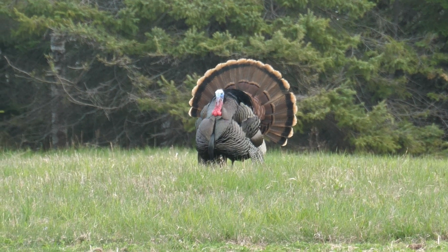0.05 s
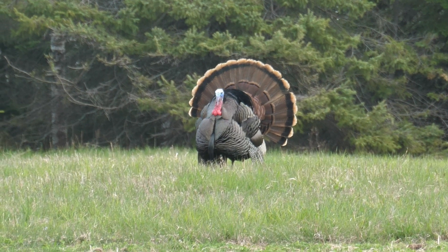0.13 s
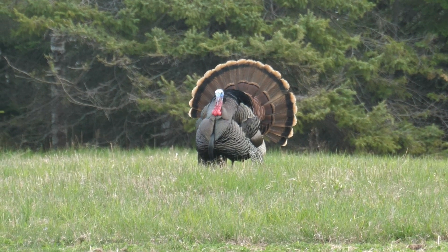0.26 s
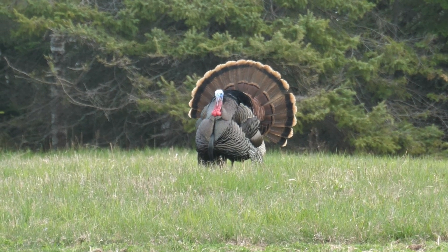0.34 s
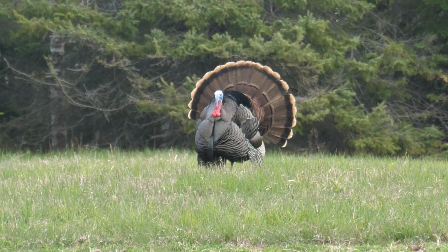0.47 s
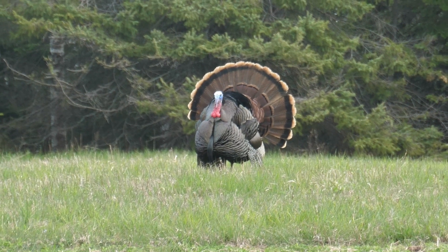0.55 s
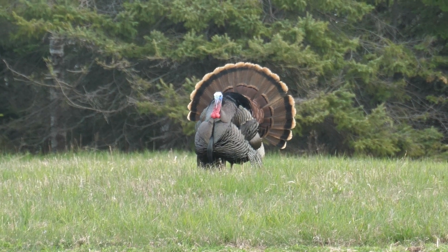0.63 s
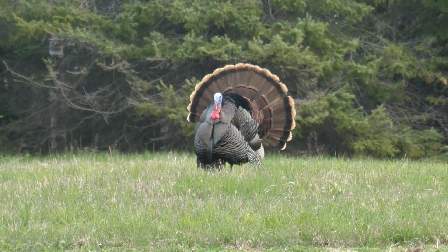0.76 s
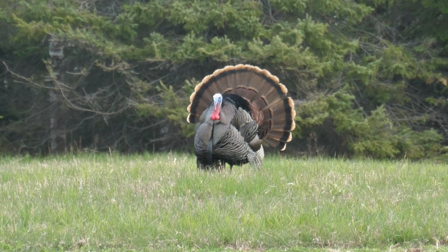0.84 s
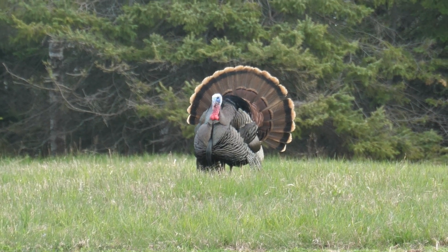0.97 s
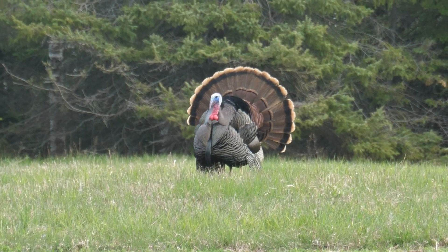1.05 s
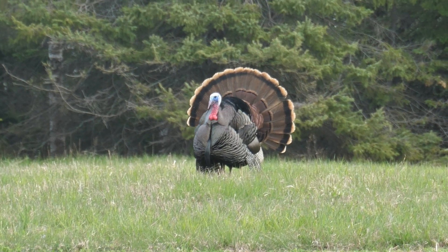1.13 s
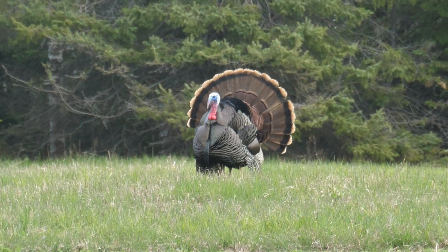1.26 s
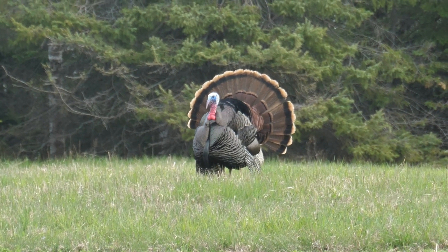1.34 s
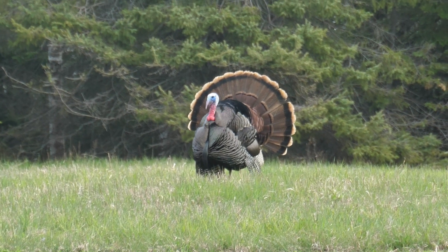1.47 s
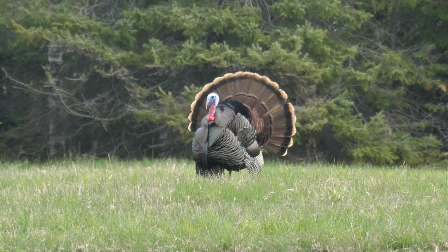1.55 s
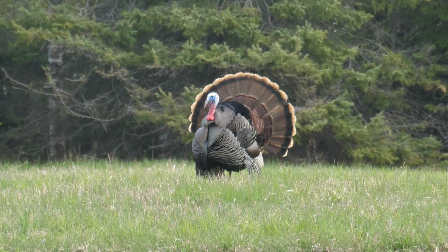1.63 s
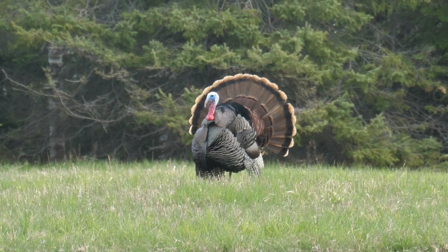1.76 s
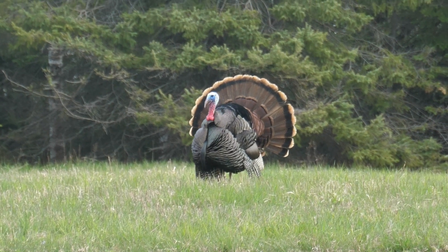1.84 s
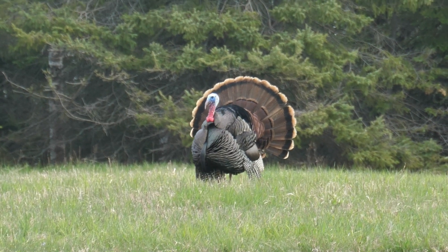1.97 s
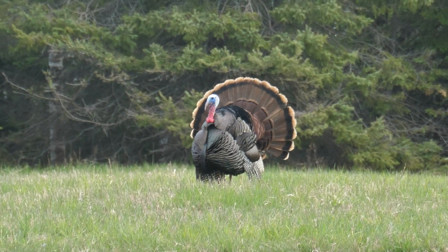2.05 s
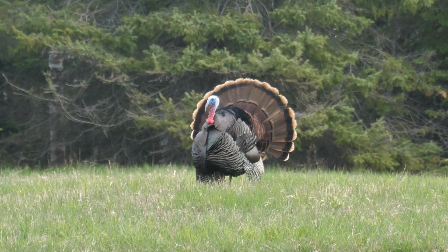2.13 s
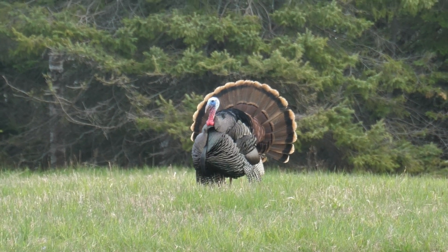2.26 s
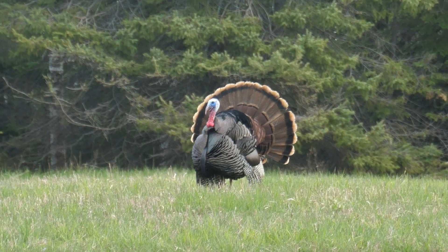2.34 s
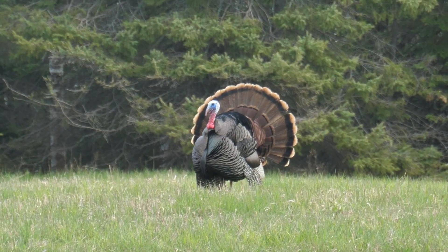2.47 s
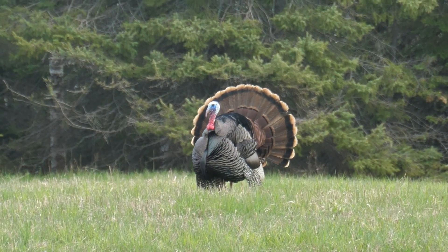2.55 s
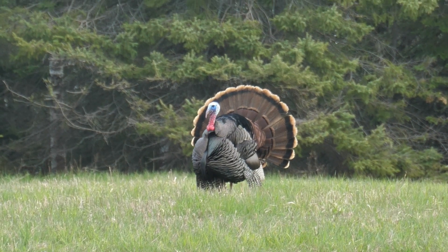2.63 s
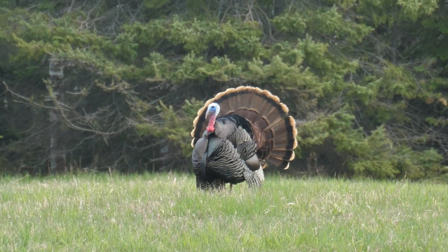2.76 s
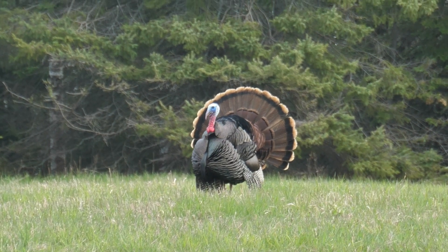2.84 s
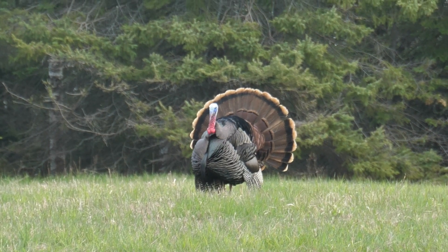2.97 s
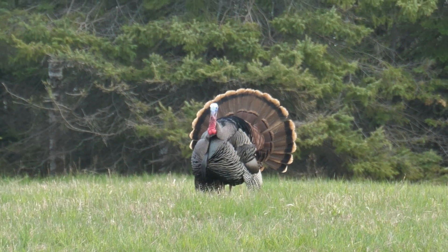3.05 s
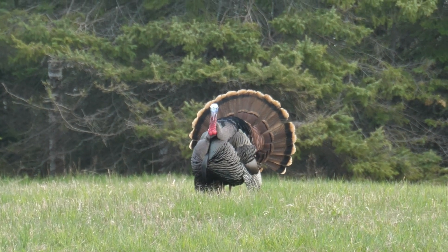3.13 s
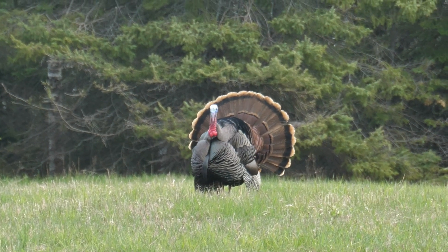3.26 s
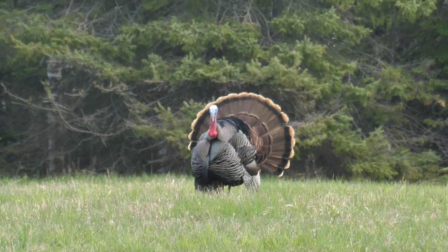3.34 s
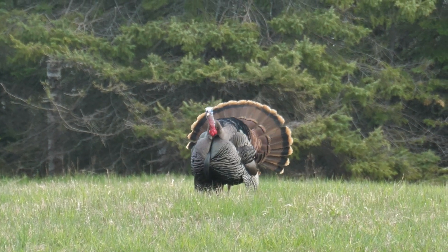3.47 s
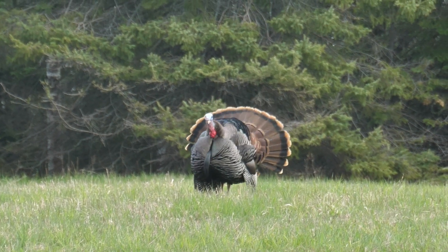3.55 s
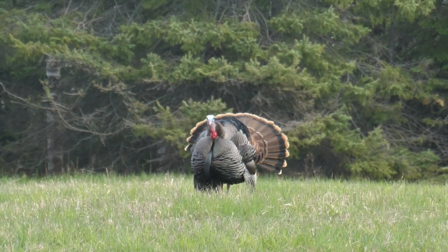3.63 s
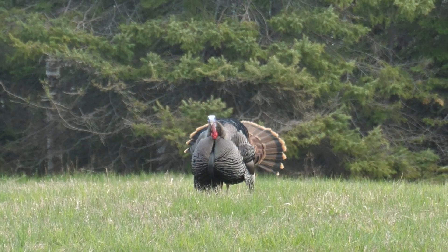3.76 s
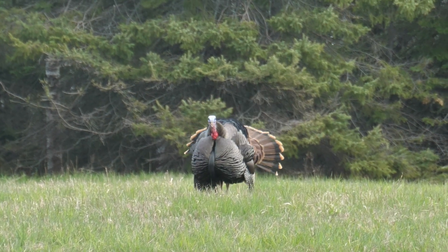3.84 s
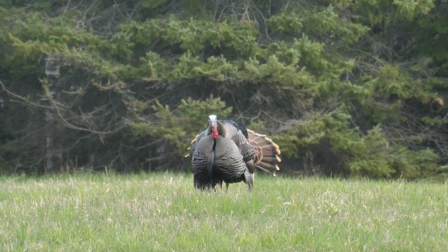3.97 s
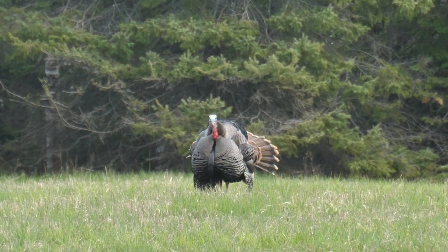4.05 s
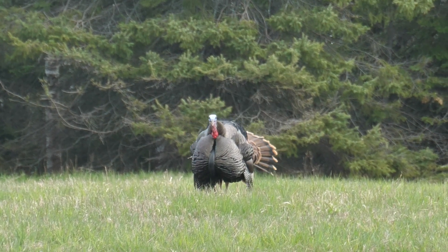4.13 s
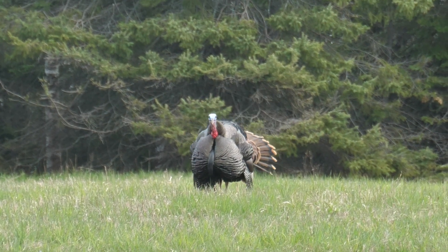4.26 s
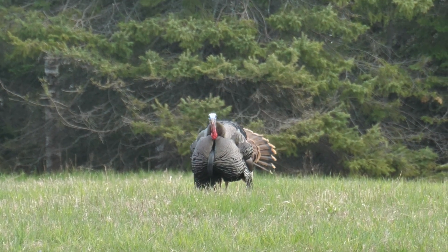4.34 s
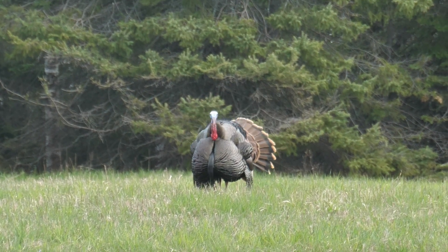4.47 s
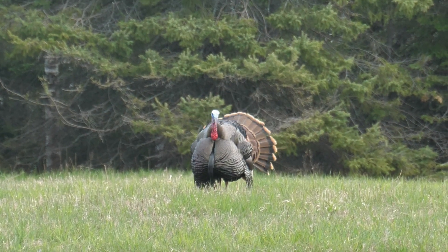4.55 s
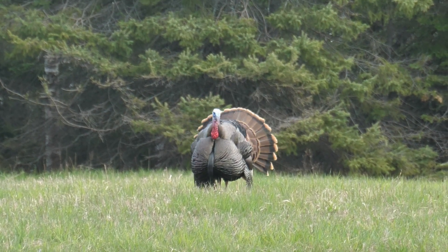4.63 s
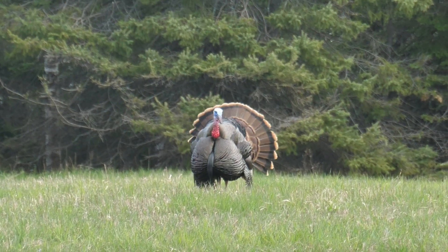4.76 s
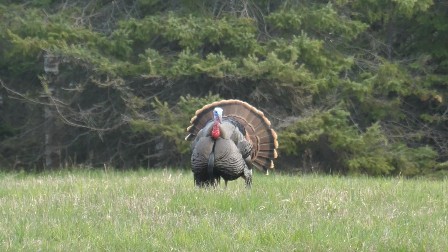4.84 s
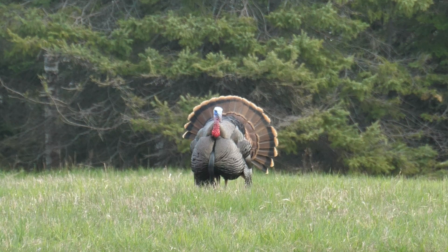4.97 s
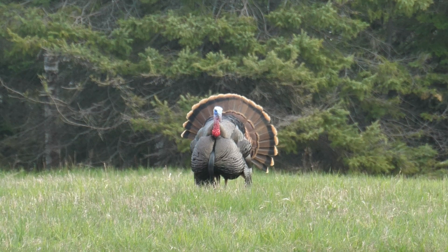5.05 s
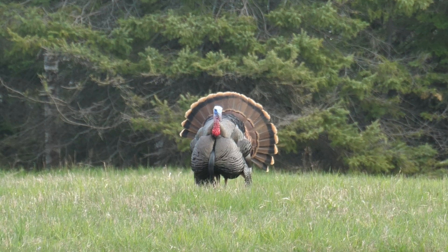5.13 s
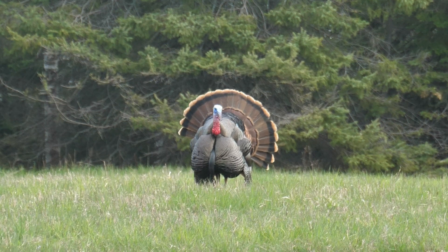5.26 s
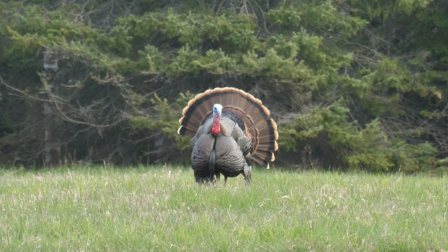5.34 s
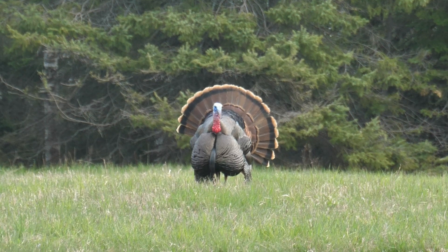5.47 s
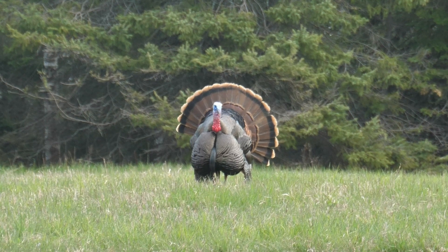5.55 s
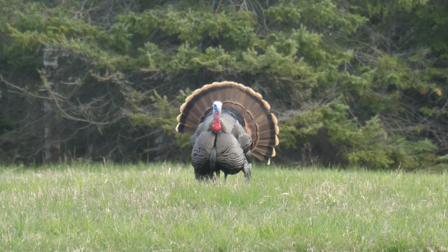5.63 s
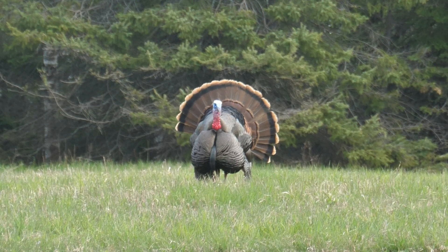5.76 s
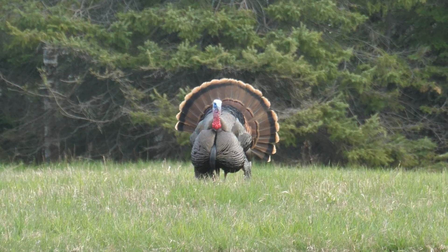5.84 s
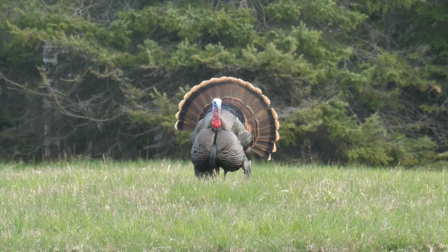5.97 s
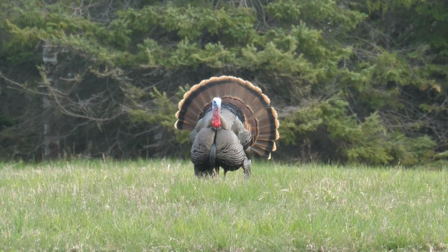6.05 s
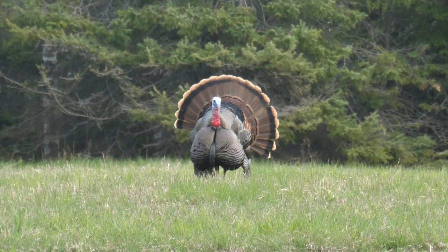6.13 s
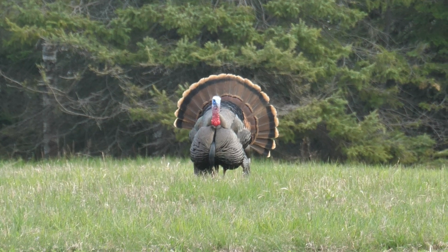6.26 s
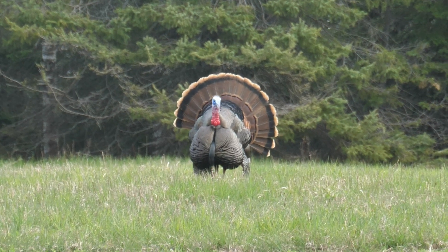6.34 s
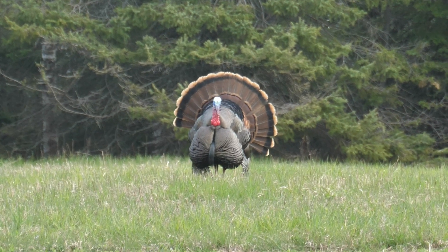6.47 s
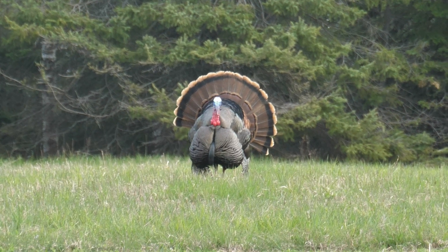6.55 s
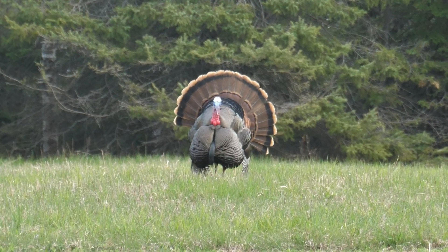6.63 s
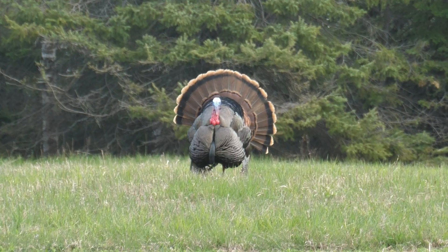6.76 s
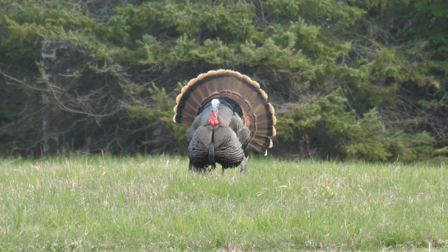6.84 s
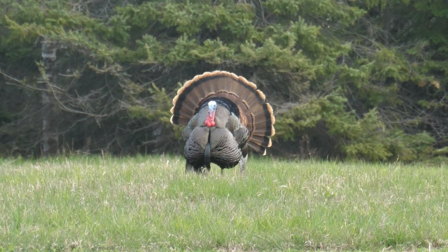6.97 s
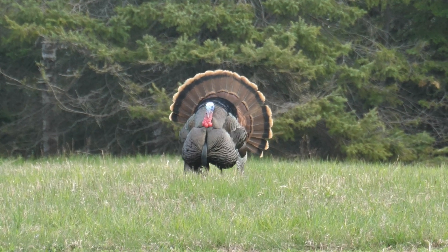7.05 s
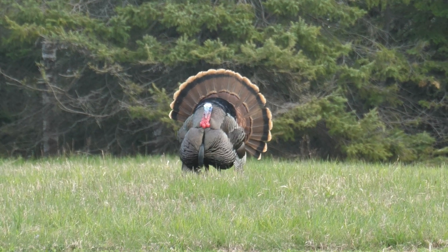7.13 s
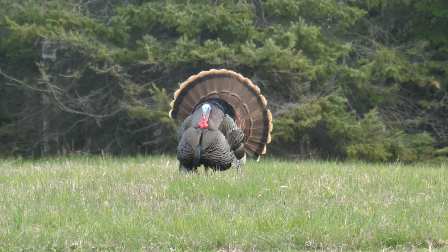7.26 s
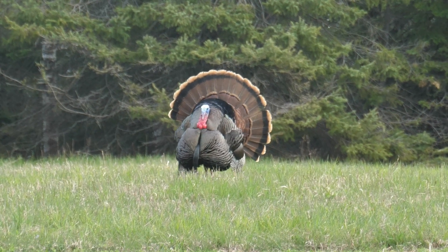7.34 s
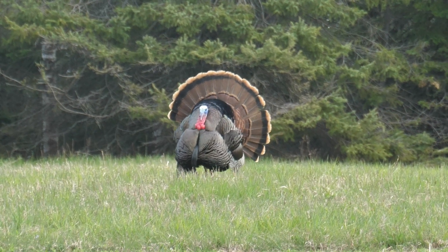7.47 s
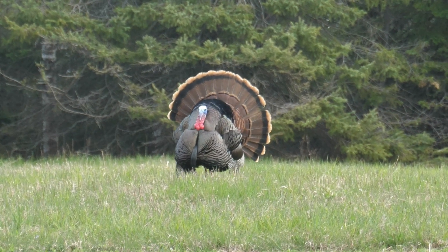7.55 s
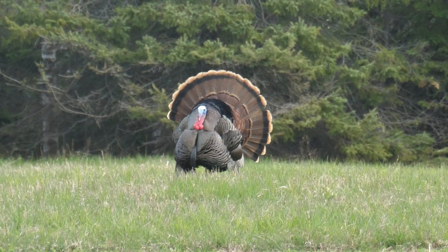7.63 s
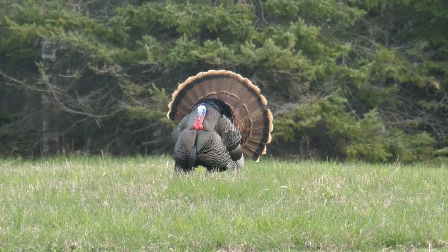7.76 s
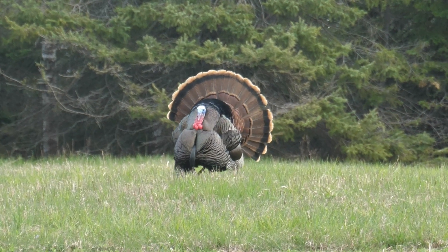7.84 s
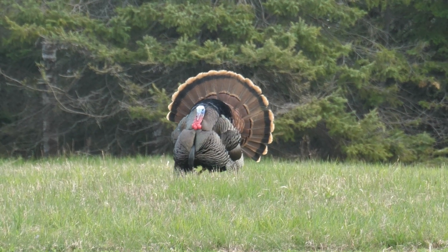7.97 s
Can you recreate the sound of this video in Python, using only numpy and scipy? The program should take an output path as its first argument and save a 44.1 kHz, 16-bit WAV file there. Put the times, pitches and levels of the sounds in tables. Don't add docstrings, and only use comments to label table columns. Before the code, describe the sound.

In a quiet meadow by pines, a wild turkey gives one loud rattling gobble amid thin birdsong, then later a tiny dry spit.

```python
import sys
import numpy as np
from scipy import signal
from scipy.io import wavfile
from scipy.ndimage import uniform_filter1d

SR = 44100
rng = np.random.default_rng(int(sys.argv[2]) if len(sys.argv) > 2 else 0)


def volts(x):
    e = np.asarray(x, float) / 20
    return 10 ** e


def generate_wav(signal):
    frames = np.transpose(np.atleast_2d(signal))
    scaled = np.clip(frames, -1, 1) * 32767
    pcm = np.round(scaled).astype(np.int16)
    wavfile.write(sys.argv[1], SR, pcm)


N = 352800


def evened(x):
    return x / np.sqrt(np.mean(x ** 2) + 1e-20)


def read(points, hz):
    f, value = np.transpose(points)
    return np.interp(np.log(hz + 1), np.log(f + 1), value)


def curve(points, s):
    return np.interp(s, *np.transpose(points))


def add(mix, s, sound):
    part = mix[max(round(s * SR), 0):][:len(sound)]
    part += sound[:len(part)]


def resonate(x, hz, width):
    turn = np.exp(2j * np.pi * np.cumsum(hz * np.ones(len(x))) / SR)
    r = np.exp(-np.pi * width / SR)
    smooth = signal.lfilter([(1 - r) ** 2], [1, -2 * r, r * r], x / turn)
    return 2 * (turn * smooth).real


def wander(count, hz):
    noise = rng.standard_normal(N // 32)
    return evened(signal.lfilter([1], [1, -np.exp(-2 * np.pi * hz / SR)], noise)[500:500 + count])


def cluck(db, hz, rough, chest_db, throat, jitter):
    count = len(hz)
    turns = np.cumsum(hz * (1 + jitter * rough * wander(count, 344))) / SR
    pulses = sum(np.sin(2 * np.pi * k * turns) * (k * hz < 9000) for k in range(1, 24))
    pulses = pulses * np.exp(1.2 * rough * wander(count, 310))
    puff = 0.28 + np.exp(-(turns % 1) / 0.18)
    breath = puff * rng.standard_normal(count)
    drive = (1 - rough) * evened(pulses) + rough * evened(breath)
    beak = (hz / hz.mean()) ** 0.82
    voiced = 0
    for f, width, gain_db in throat:
        in_chest = 800 < f < 1450
        voiced = voiced + volts(gain_db + chest_db * in_chest) * resonate(drive, f * beak, width)
    return volts(db) * evened(voiced) * np.hanning(count)


# centre in seconds, length in seconds, level in dB,
# starting pitch in Hz, final pitch in Hz.
CLUCKS = [(3.686, 0.021, -20.5, 1088, 1027), (3.721, .018, -38, 1290, 1380),
          (3.733, 0.02, -21.5, 1120, 1042), (3.763, 0.022, -29, 1200, 1150),
          (3.774, 0.028, -19.5, 1150, 1044), (3.882, .02, -21.5, 1071, 1020),
          (3.895, .012, -29, 1100, 1020), (3.922, 0.02, -18.5, 1101, 1041), (3.935, .014, -25, 1050, 1043),
          (4.037, 0.018, -22.5, 1040, 1020), (4.077, 0.02, -22, 1124, 976), (4.201, 0.02, -22, 1050, 1020),
          (4.209, .022, -25.5, 1050, 1050), (4.237, .032, -25.5, 1150, 1114),
          (4.245, 0.014, -20.5, 1020, 1020), (4.362, 0.021, -24.5, 1090, 965),
          (4.395, 0.035, -26, 1126, 1113), (4.404, .022, -23, 1106, 1076),
          (4.524, 0.035, -24.5, 1138, 1069), (3.674, .014, -38, 1116, 1100), (4.542, .035, -38, 1020, 1065)]
# time in seconds, roughness from 0 to 1.
STRAIN = [(3.69, .14), (3.73, .36), (3.78, .32), (3.9, .28), (4.04, .26), (4.25, .16), (4.36, .24),
          (4.5, .14)]
# time in seconds, chest gain in dB.
CHEST_WAKES = [(3.69, -5), (3.735, 11), (3.78, 4), (3.88, 0), (3.96, 1), (4.08, 1.5), (4.25, 2.5), (4.4, 0),
               (4.53, 4.5)]
# frequency in Hz, width in Hz, gain in dB.
CLEAR_THROAT = [(1020, 230, -1), (2310, 1000, -1.5), (3200, 630, 4), (3630, 770, -3), (5400, 400, -10),
                (6570, 150, -12)]


def clear_clucks(out):
    overshoot, glide_bend = 0.0576, 1.81
    for s, length, db, from_hz, to_hz in CLUCKS:
        left = np.linspace(1, 0, round(length * SR)) ** glide_bend
        hz = to_hz + (from_hz * (1 + overshoot) - to_hz) * left
        chest_db = 1.1 * (db + 23.5) - 0.06 * (hz.mean() - 1050)
        chest_db = chest_db + curve(CHEST_WAKES, s)
        add(out, s - length / 2, cluck(db, hz, curve(STRAIN, s), chest_db, CLEAR_THROAT, 0.16))


# centre in seconds, length in seconds, level in dB,
# starting pitch in Hz, final pitch in Hz.
FALLS = [
    (3.602, .02, -25.5, 870, 640),
    (3.746, .026, -32, 646, 560),
    (3.793, .018, -33, 613, 570),
    (3.818, .036, -31, 645, 620),
    (3.977, .026, -30.5, 672, 652),
    (4.325, .024, -34, 600, 524),
    (4.483, .022, -34.5, 585, 527),
]
# frequency in Hz, width in Hz, gain in dB.
FALL_THROAT = [(1200, 160, -10), (1840, 420, -0.5), (2200, 250, 1), (4860, 970, -15)]


def nasal_falls(out):
    for s, length, db, from_hz, to_hz in FALLS:
        hz = np.linspace(from_hz, to_hz, round(length * SR))
        add(out, s - length / 2, cluck(db, hz, 0.16, 0., FALL_THROAT, 0.17))


def sagging_clucks(out, rows, throat, fall, jitter):
    for s, length, db, hz, rough, chest_db in rows:
        sag = np.linspace(1 + fall, 1 - fall, round(length * SR))
        add(out, s - length / 2, cluck(db, hz * sag, np.clip(rough, 0, 1), chest_db, throat, jitter))


# centre in seconds, length in seconds, level in dB, pitch in Hz.
HUMS = [
    (3.958, .027, -28, 962),
    (4.13, .024, -38, 900),
    (4.301, .024, -37, 883),
    (4.431, .04, -37.5, 1093),
    (4.457, .025, -37, 895),
    (4.705, .055, -46, 1060),
]


def hums(out):
    rows = [row + (.21, 19) for row in HUMS]  # roughness, chest dB
    sagging_clucks(out, rows, CLEAR_THROAT, 0.058, .14)


# centre in seconds, length in seconds, level in dB,
# roughness from 0 to 1, chest gain in dB.
RASPS = [(3.696, 0.027, -30, 0.56, -10), (3.745, .034, -23, 0.28, -2.5), (3.784, .018, -24.5, 0.12, -9),
         (3.799, 0.015, -24.5, 0.3, 9), (3.813, 0.034, -25, 0.14, 9), (3.836, 0.025, -30, 0.18, 7),
         (3.909, 0.025, -26, 0.45, -8), (3.952, .024, -31, .4, -12), (3.97, .024, -28, 0.5, -12),
         (3.986, 0.035, -28, 0.34, -14), (4.049, .024, -28, 0.33, 0), (4.154, .059, -28, 0.34, -16),
         (4.316, .047, -30, 0.33, -24), (4.38, 0.022, -33, .42, -2), (4.473, .038, -29.5, 0.28, -4.5),
         (4.487, .016, -30, 0.35, 0)]
# time in seconds, pitch in Hz.
RASP_PITCH = [(3.788, 592.6), (3.8, 546.7), (3.85, 532), (4.05, 527.4), (4.15, 532), (4.5, 530.3)]
# frequency in Hz, width in Hz, gain in dB.
RASP_THROAT = [(570, 130, -11), (1080, 220, -1), (1450, 260, -8), (1800, 300, -8), (2200, 300, -9),
               (2680, 350, -9), (3200, 150, 3), (3700, 150, 0), (4800, 1200, -14), (6800, 1200, -27)]


def rasps(out):
    rows = [(s, length, db, curve(RASP_PITCH, s), rough, chest_db)
            for s, length, db, rough, chest_db in RASPS]
    sagging_clucks(out, rows, RASP_THROAT, .015, .14)


# centre in seconds, length in seconds, level in dB, pitch in Hz.
OPENING = [
    (3.546, .024, -29, 342.5),
    (3.557, .032, -19, 320.6),
    (3.572, .026, -20.5, 349.5),
    (3.565, .03, -23.5, 250),
    (3.542, 0.0086, -33, 300),
]
# frequency in Hz, width in Hz, gain in dB.
WIDE_THROAT = [(595, 160, -39), (1260, 140, 11), (1735, 82, 12.5), (2350, 720, 6), (3040, 920, 7),
               (4200, 650, 0.5), (5200, 780, -8)]


def opening(out):
    rows = [row + (0.155, -9.5) for row in OPENING]  # roughness, chest dB
    sagging_clucks(out, rows, WIDE_THROAT, .03, 1.3)


# centre in seconds, length in seconds, level in dB, pitch in Hz, chest gain in dB.
GULP = [
    (3.6, 0.027, -28.5, 815, -6),
    (3.612, 0.028, -20, 630.6, -24),
    (3.625, 0.03, -20, 657, 5.5),
    (3.636, 0.018, -28, 665, 2),
    (3.647, 0.026, -32, 673, 22),
    (3.667, 0.015, -49, 610, -2),
]
# frequency in Hz, width in Hz, gain in dB.
GULP_THROAT = [(640, 200, -14.5), (923, 190, -1.5), (1330, 390, -1.5), (1755, 240, 7), (2400, 290, -3.5),
               (4500, 1800, -10.5), (5940, 1000, -23)]


def gulp(out):
    rows = [(s, length, db, hz, 0.2, chest_db) for s, length, db, hz, chest_db in GULP]
    sagging_clucks(out, rows, GULP_THROAT, .07, .16)


def gobble():
    out = np.zeros(N)
    for part in (opening, gulp, clear_clucks, rasps, nasal_falls, hums):
        part(out)
    return out


# time in seconds, level in dB.
SPIT = [
    (7.049, -52),
    (7.051, -38),
    (7.056, -33.5),
    (7.065, -35),
    (7.069, -39),
    (7.075, -37),
    (7.092, -50),
    (7.11, -60),
]
# frequency in Hz, width in Hz, gain in dB.
SPIT_COLOUR = [(2700, 820, 7), (3600, 340, 2), (5060, 1600, 7.5), (6370, 1400, 2), (8450, 910, -17)]


def spit():
    t = np.arange(SPIT[0][0], SPIT[-1][0], 1 / SR)
    jet = rng.standard_normal(len(t)) * np.exp(0.27 * wander(len(t), 400))
    puff = evened(sum(volts(gain_db) * resonate(jet, hz, width) for hz, width, gain_db in SPIT_COLOUR))
    out = np.zeros(N)
    add(out, SPIT[0][0], volts(curve(SPIT, t)) * puff)
    return out


def whistle(hz, db, warble_hz, depth):
    turns = np.cumsum(hz + warble_hz * wander(len(hz), 140)) / SR
    flutter = evened(np.exp(depth * wander(len(hz), 35)))
    return np.sqrt(2) * volts(db) * flutter * np.sin(2 * np.pi * turns) * signal.windows.tukey(len(hz), .22)


# time from the fall in seconds, pitch in Hz, level in dB.
PHRASE = [
    [(-.052, 2350, -54), (-.03, 2480, -51.5), (-.008, 2500, -45)],
    [(0, 2620, -26), (.012, 2700, -44), (.045, 2640, -43.5), (.09, 2320, -51.5), (.14, 2140, -56)],
    [(.2, 2210, -53), (.235, 2360, -47.5), (.255, 2350, -46), (.29, 2250, -52.5), (.325, 2150, -52)],
]
# start of the fall in seconds, level in dB, time stretch as a ratio.
PHRASES = [
    (.163, -1.2, .97),
    (3.412, -2.4, 1.15),
    (5.822, -.5, .975),
]


def phrases(out):
    for start, phrase_db, stretch in PHRASES:
        for rows in PHRASE:
            s, hz, db = np.transpose(rows)
            t = np.arange(s[0], s[-1], 1 / SR / stretch)
            note = whistle(np.interp(t, s, hz), phrase_db + np.interp(t, s, db), 45., .42)
            add(out, start + s[0] * stretch, note)


# start in seconds, length in seconds, level in dB, pitch in Hz.
WHISTLES = [(0, .14, -60.5, 3335), (1.265, 0.035, -56, 4160), (1.31, 0.085, -53, 4190),
            (1.4, 0.03, -53, 4180), (1.779, 0.063, -53.5, 3860), (1.807, 0.069, -60, 3550),
            (1.907, .035, -61, 3595), (2.872, .05, -61, 4080), (3.242, 0.024, -53, 4115),
            (4.043, 0.048, -39.5, 2870), (4.646, 0.057, -43, 2870), (4.748, .025, -43.5, 2640),
            (4.79, .026, -49, 2660)]
# start in seconds, length in seconds, level in dB, pitch in Hz.
CHIPS = [
    (1.612, 0.03, -50.5, 6750),
    (1.617, 0.034, -58, 7650),
    (3.019, .03, -54.5, 7000),
    (3.982, 0.048, -49, 7180),
    (5.353, 0.02, -53, 7260),
    (7.514, .06, -56.5, 7200),
]
# start in seconds, length in seconds, level in dB,
# starting pitch in Hz, final pitch in Hz.
SLURS = [(.02, 0.14, -59, 2540, 2360), (4.004, .063, -46, 2780, 2620), (4.24, 0.055, -44, 2700, 2650),
         (4.613, 0.026, -48, 2920, 3200), (4.69, 0.038, -46, 2990, 3200), (4.715, 0.025, -50, 2765, 2540),
         (5.198, 0.043, -48.5, 2500, 2560), (5.224, .02, -49.5, 3150, 2880),
         (5.802, 0.029, -55, 2100, 1990), (5.262, 0.089, -55.5, 1960, 2110),
         (5.285, .085, -52.5, 2480, 2546), (5.232, 0.038, -47.5, 2620, 2570), (5.27, .06, -55, 2260, 2360),
         (6.19, 0.069, -55.5, 2340, 2240), (6.3, .08, -60, 2260, 2200), (1.2, .07, -63, 4400, 4170),
         (5.97, 0.049, -53, 2460, 2400)]
# start in seconds, length in seconds, level in dB,
# starting pitch in Hz, final pitch in Hz.
FAINT = [
    (2.995, .05, -60, 4600, 3200),
    (3.375, .04, -57, 3750, 3200),
    (3.065, .07, -62, 3500, 3560),
    (1.117, .153, -64, 2980, 2890),
    (5.255, .03, -57, 2400, 2000),
    (5.38, .13, -57, 2400, 2400),
]


def songbirds():
    sag, rise = 0.0013, 0.0335
    out = np.zeros(N)
    phrases(out)
    level = [(s, length, db, hz * (1 + sag), hz * (1 - sag)) for s, length, db, hz in WHISTLES]
    chips = [(s, length, db, hz * (1 - rise), hz * (1 + rise)) for s, length, db, hz in CHIPS]
    for rows, warble_hz, depth in ((level, 10., .25), (chips, 170., .4), (SLURS, 50., .25), (FAINT, 130., .6)):
        for s, length, db, from_hz, to_hz in rows:
            hz = np.linspace(from_hz, to_hz, round(length * SR))
            add(out, s, whistle(hz, db, warble_hz, depth))
    return out


# start in seconds, length in seconds, level in dB, throat in Hz, clucks per second.
FAR = [
    (-.062, 1.22, -49.5, 896, 12.3),
    (3.918, 0.73, -40, 900, 19),
]
FAR_FADE_DB_PER_S = (-3, -18.5)


def far_turkey():
    sag, edge_share, throb = 0.065, 0.1, 0.23
    out = np.zeros(N)
    for (s, length, db, hz, per_s), upper_db, fade_db in zip(FAR, (-12., -3.5), FAR_FADE_DB_PER_S):
        t = np.arange(max(-s, 0), length, 1 / SR)
        breath = rng.standard_normal(len(t))
        hz = hz * (1 - sag * t / length)
        lower = evened(resonate(breath, hz, 220.0))
        upper = evened(resonate(breath, 1.71 * hz, 210.0))
        edges = np.clip(np.minimum(t, length - t) / (edge_share * length / 2), 0, 1)
        clucks = 1 + throb * np.sin(2 * np.pi * per_s * t)
        add(out, s, volts(db + fade_db * t) * edges * (lower + volts(upper_db) * upper) * clucks)
    return out


# frequency in Hz, gain in dB.
BEHIND = [(500, -5.), (850, -1.), (1100, 1.), (1500, 0.), (2200, -7.), (3300, -12.), (7000, -10.)]
# frequency in Hz, time to fall 60 dB in seconds.
TREES = [(500, 4.4), (1000, 1.2), (2400, 1.6), (3500, 1.5), (7000, 1.65)]


def trees(x, start_s, stir_hz, colour, linger):
    stir = evened(resonate(rng.standard_normal(N), stir_hz, stir_hz))
    taps = np.zeros(SR)
    at = np.arange(0, SR - 20, 20) + rng.integers(0, 20, SR // 20 - 1)
    taps[at] = rng.choice([-1., 1.], len(at)) * np.clip(at / SR / start_s - 1, 0, 1)
    hz, t, z = signal.stft(taps, SR, nperseg=256)
    decay_db = -60 * t / linger / read(TREES, hz)[:, None]
    tail = signal.istft(z * volts(read(colour, hz)[:, None] + decay_db), SR, nperseg=256)[1]
    return signal.fftconvolve(x * (0.36 + 0.75 * stir), tail / np.linalg.norm(tail))[:N]


# time in seconds, level in dB.
GUST = [(0, -43), (.22, -45.5), (0.601, -48.5), (1.69, -52), (1.87, -48), (2.16, -51.5), (3.081, -49),
        (4.32, -48), (5.01, -51), (5.77, -50), (6.88, -51), (7.69, -51.5), (8, -47)]
# centre in seconds, length in seconds, level in dB, frequency in Hz.
BUMPS = [(0.06, 0.056, -44, 69.6), (0.143, 0.064, -29, 81), (0.496, 0.13, -33, 40.3),
         (0.803, 0.048, -28.5, 118), (2.589, 0.071, -40, 97), (3.277, 0.095, -36, 69),
         (3.895, 0.058, -35.5, 90.6), (4.038, 0.0556, -26, 123.5), (4.144, 0.052, -36, 70.5),
         (4.216, 0.063, -30, 63), (4.347, .08, -34, 81), (4.728, 0.038, -34.5, 119.3),
         (6.096, 0.038, -26.5, 125), (7.852, 0.041, -28.5, 126)]


def air():
    low = resonate(rng.standard_normal(N), 25.4, 28.0)
    high = resonate(rng.standard_normal(N), 73.4, 72.0)
    out = volts(curve(GUST, np.arange(N) / SR) + 3.0) * evened(low + 0.63 * high)
    for s, length, db, hz in BUMPS:
        t = np.arange(round(length * SR)) / SR
        add(out, s - length / 2, volts(db - 4.5) * np.sin(2 * np.pi * hz * t) * np.hanning(len(t)))
    return out


# time in seconds, level in dB.
CHORUS = [(0, -62), (.8, -61), (2.1, -62), (2.8, -56), (3.5, -52.5), (4.7, -59.5), (8, -72)]


def chorus():
    centre_hz, width_hz, tweets_per_s = 3707, 1500., 420
    out, t = np.zeros(N), np.arange(1800) / SR
    swell = np.sin(np.pi * t / t[-1]) ** 2
    voices = rng.standard_normal((20, 2))
    for s, who in rng.random((round(tweets_per_s * N / SR), 2)):
        bird = who * len(voices)
        pitch, glide = voices[int(bird)]
        hz = centre_hz + width_hz * (pitch / 4 + bird % 1 - .5) + 3050.0 * (glide - 1) * t
        add(out, s * N / SR, np.sin(2 * np.pi * hz * t) * swell)
    return volts(curve(CHORUS, np.arange(N) / SR)) * evened(out)


# frequency in Hz, density in dB per Hz.
HISS = [(53, -17), (90, -5), (161, -5), (253, -4), (288, -11), (321, -5.5), (416, -9), (563, -10),
        (669, -11.5), (886, -13), (1550, -16), (3160, -21), (15600, -28.5)]


def hiss():
    frames, hz = N // 256 + 5, np.fft.rfftfreq(1024, 1 / SR)
    a, b, patches = rng.standard_normal((frames, 513, 3)).T
    patches = uniform_filter1d(patches, size=12, axis=0)
    patches = evened(uniform_filter1d(patches, size=20, axis=1))
    z = (a + 1j * b) * volts(read(HISS, hz)[:, None] + .55 * patches)
    return volts(-42.5) * evened(signal.istft(z, nperseg=1024, noverlap=768)[1][:N])


def noise_fill(mid):
    hz, t, z = signal.stft(mid, SR, nperseg=2048)
    band = np.clip((hz - 4100) // 1450, -1, 8).astype(int)
    loudness = abs(z[40:200]).mean(0)
    quiet = (rng.random(len(t)) < .15) & (loudness < 1.5 * np.median(loudness))
    chosen = (rng.random((10, len(t))) < .2) & quiet
    chosen[-2:] = False
    turned = np.exp(2j * np.pi * rng.random(z.shape))
    return volts(2.5) * signal.istft(z * turned * chosen[band], SR, nperseg=2048)[1][:N]


def scene():
    turkey, birds = gobble(), songbirds()
    turkey = turkey + volts(-7.5) * trees(turkey, 0.0024, 36.3, BEHIND, 0.69)
    birds = volts(3.5) * birds + volts(-2.0) * trees(birds, 0.013, 72.0, [(2600, 1.3), (4000, -4.0)], 1.)
    return np.tile(turkey + spit() + birds + far_turkey() + air() + chorus() + hiss(), (2, 1))


def roll_off(x):
    return signal.sosfilt(signal.butter(12, 16760, fs=SR, output="sos"), x)


def record(dry):
    low_pass = signal.firwin(1023, 15790, window=("kaiser", 9), fs=SR)
    cut = signal.oaconvolve(dry, low_pass[None], "same")
    mix = cut + noise_fill(cut[0]) * [[1], [-1]] - .0022
    return roll_off(mix)


dry = scene()
out = record(dry)
generate_wav(out)
```